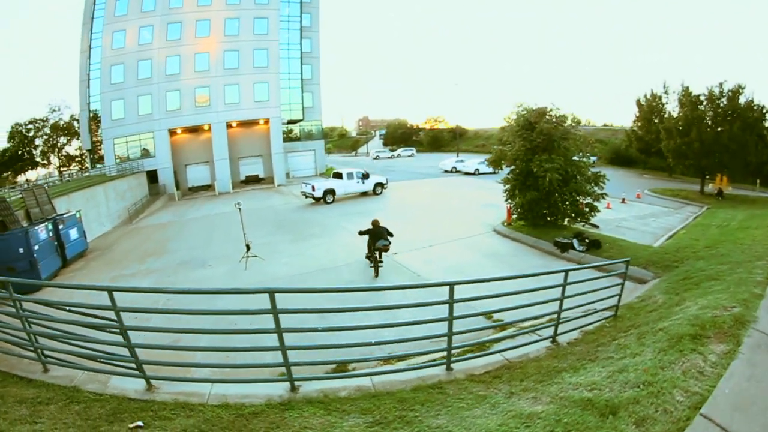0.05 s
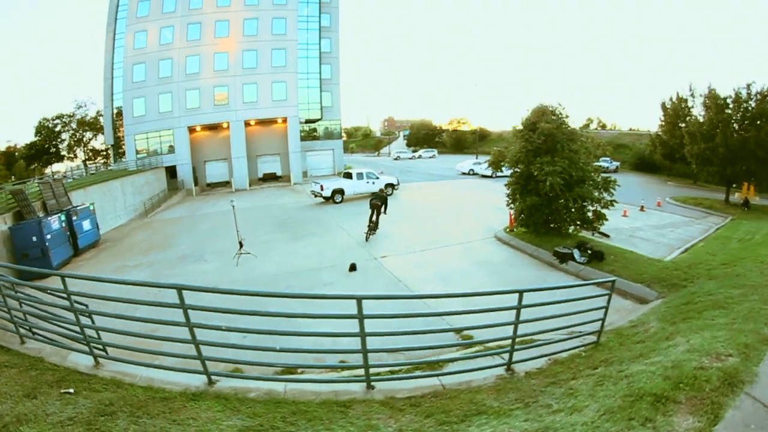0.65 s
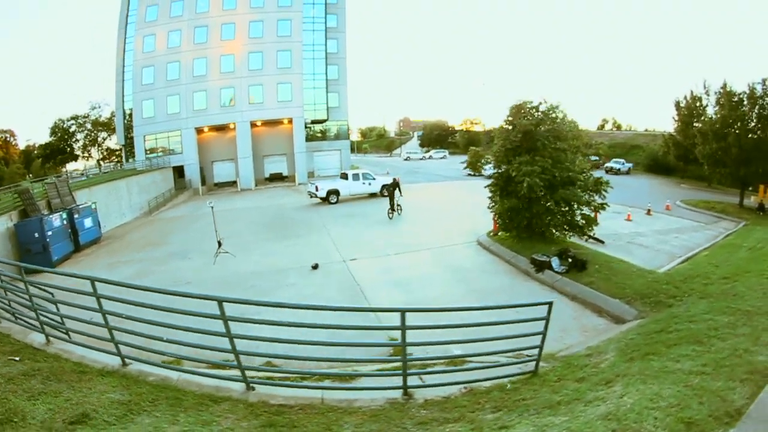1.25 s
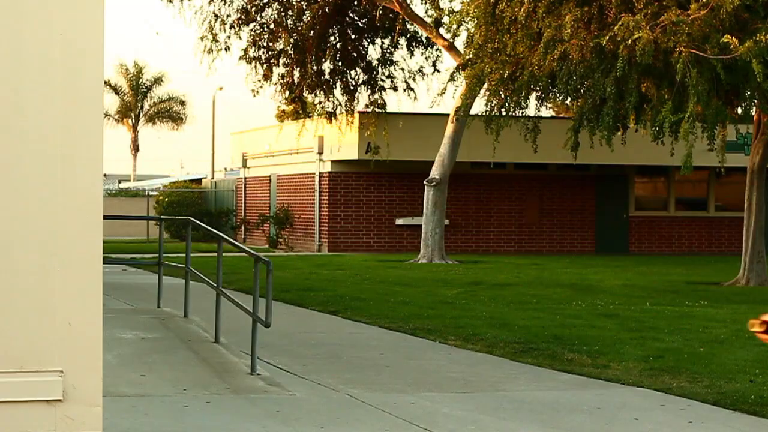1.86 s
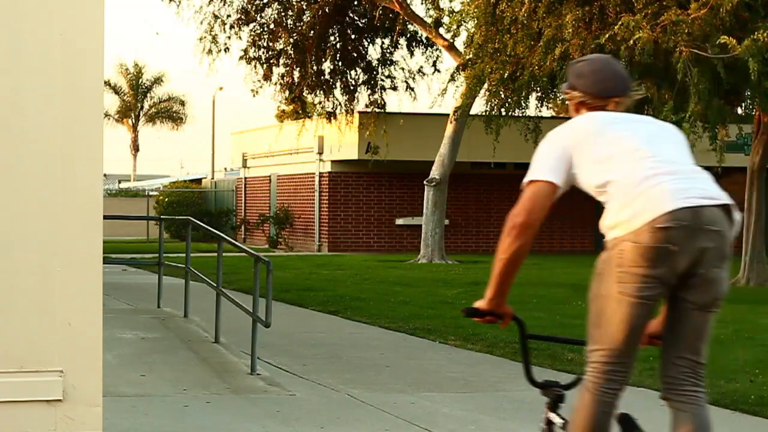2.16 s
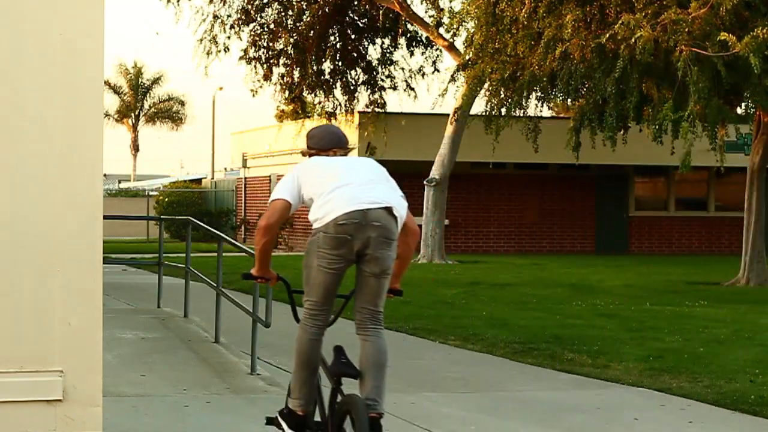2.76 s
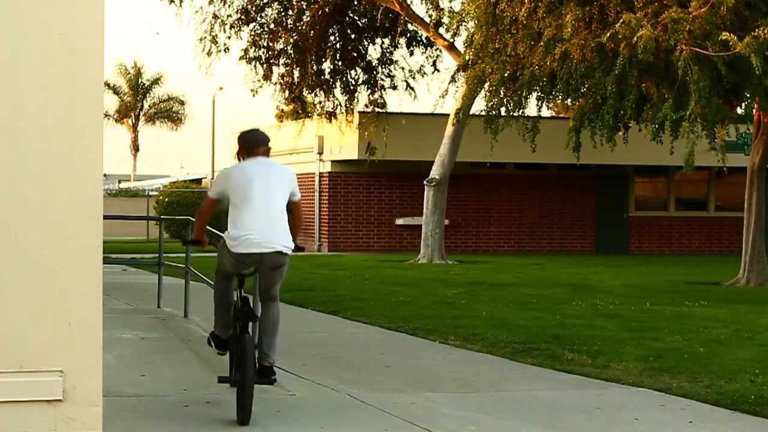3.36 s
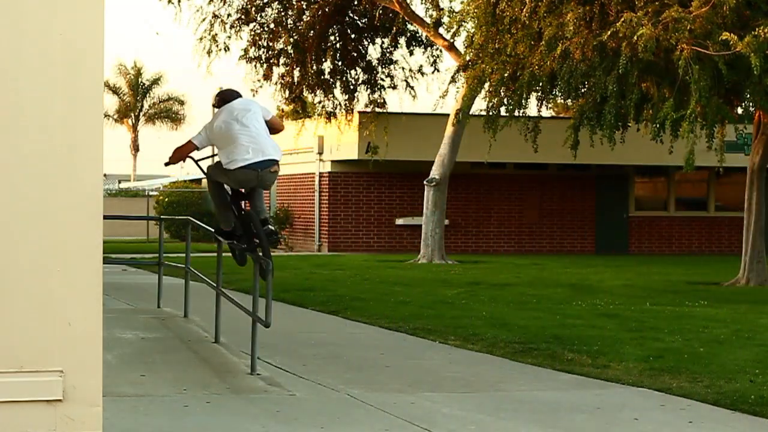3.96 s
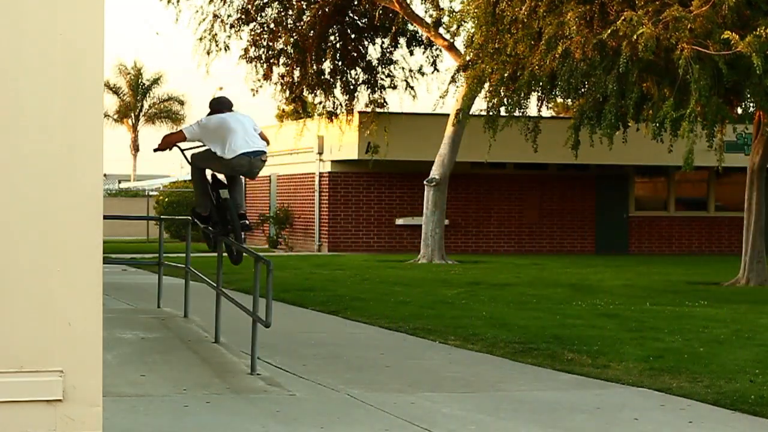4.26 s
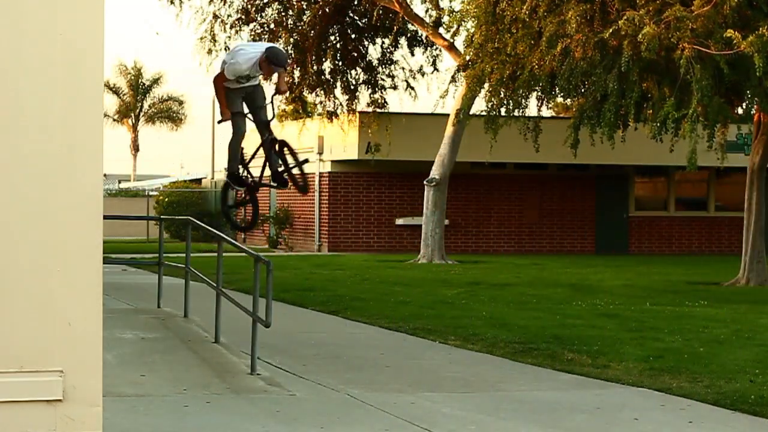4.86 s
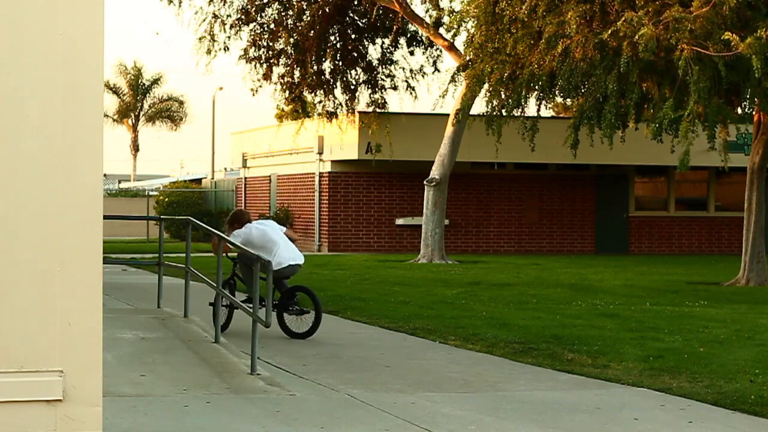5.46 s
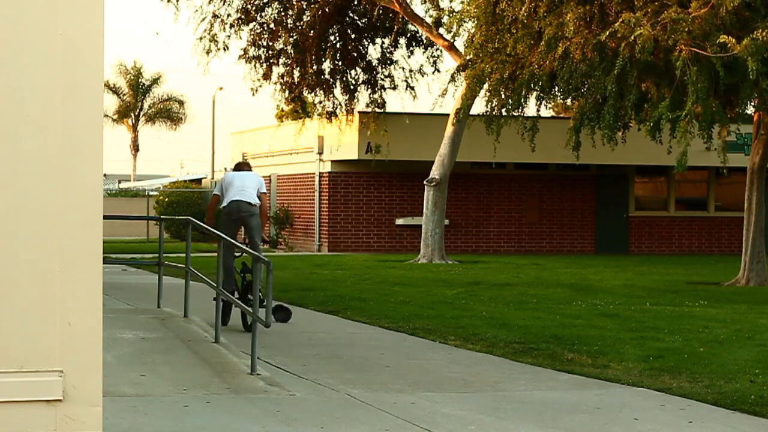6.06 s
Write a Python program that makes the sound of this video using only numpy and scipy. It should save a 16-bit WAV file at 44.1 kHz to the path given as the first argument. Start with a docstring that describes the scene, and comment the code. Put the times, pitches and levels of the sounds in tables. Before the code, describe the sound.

A bicycle freewheel buzzes through gusts, pauses, then buzzes again before a ringing handrail grind and a clattering landing.

```python
"""BMX coasting and rail grind

Two runs head away from the microphone, parted by a short silence. In the first, gusts buffet the
microphone, loose parts rattle and the freewheel buzzes as its pawls drop off the ratchet teeth.
In the second, the bike coasts to a steel handrail and hops on with a crack; sliding friction keeps
the pipe's modes ringing. It lands with a few knocks and rolls off ticking, echoed by nearby walls."""
import sys
import numpy as np
from scipy import signal
from scipy.fft import rfft, irfft, next_fast_len
from scipy.io import wavfile
from scipy.ndimage import map_coordinates

SR = 44100
rng = np.random.default_rng(int(sys.argv[2]) if len(sys.argv) > 2 else 0)


def wrap_up_sound(samples):
    """Save the sound to the file named by the first command line argument, as 16-bit audio."""
    columns = np.atleast_2d(samples).T
    # keep every value between -1 and 1, then stretch to whole-number steps
    tamed = np.clip(columns, -1, 1)
    steps = np.round(tamed * 32767).astype(np.int16)
    wavfile.write(sys.argv[1], SR, steps)


N = 269451
FIRST_RUN_END_S, SECOND_RUN_S, STRIKE_S = 1.509, 1.741, 3.9992  # strike: the peg meets the rail
# modes of the bike's frame: (frequency [Hz], relative level [dB], t60 [s])
FRAME_MODES = [(277, -2.5, 0.056), (384.6, -5, 0.19), (686.5, 1, 0.061), (1068, -11, 0.055),
               (1340, -2, 0.031), (2370, 6, 0.025)]


def amp(db):
    """Decibels to amplitude ratio."""
    return 10 ** (np.asarray(db) / 20)


def unit(x):
    """x at rms 1."""
    return x / np.sqrt(np.mean(x ** 2) + 1e-20)


def along(points, hz):
    """(frequency [Hz], value) points interpolated on a log axis."""
    f, v = np.transpose(points)
    return np.interp(np.log(hz + 1), np.log(f + 1), v)


def curves(rows):
    """One value per sample for each column after the time."""
    s, *cols = np.transpose(rows)
    return [np.interp(np.arange(N) / SR, s, c) for c in cols]


def during(start, end=np.inf):
    """True between two times."""
    t = np.arange(N) / SR
    return (t >= start) & (t < end)


def since(s):
    """Seconds elapsed since time s, zero before it."""
    return np.maximum(np.arange(N) / SR - s, 0)


def wobble(rate):
    """A smooth random curve, rate knots a second."""
    return map_coordinates(rng.standard_normal(N // 8), [np.arange(N) * rate / SR], mode="wrap")


def add(track, s, sound):
    """Superpose a sound on a track at time s."""
    part = track[max(round(s * SR), 0):][:len(sound)]
    part += sound[:len(part)]


def burst(t60, size=8192):
    """Exponentially decaying noise of energy 1."""
    decay = rng.standard_normal(size) * amp(-60 * np.arange(size) / SR / t60)
    return decay / np.linalg.norm(decay)


def coloured(x, spectrum, size=4096):
    """x through a minimum-phase filter of energy 1, shaped by (frequency [Hz], level [dB]) points."""
    cepstrum = irfft(np.log(amp(along(spectrum, np.fft.rfftfreq(size, 1 / SR)))))
    cepstrum[1:size // 2] *= 2
    cepstrum[size // 2 + 1:] = 0
    response = irfft(np.exp(rfft(cepstrum)))
    return signal.fftconvolve(x, response / np.linalg.norm(response))[:len(x)]


def noise(spectrum):
    """Coloured noise of rms 1."""
    return unit(coloured(rng.standard_normal(N), spectrum))


def ring(modes, vary_db):
    """Free vibration: one second of damped modes, energy 1, of random strength and phase."""
    t = np.arange(SR) / SR
    tone = np.zeros(SR)
    for hz, db, t60 in modes:
        envelope = amp(db + vary_db * rng.normal() - 60 * t / t60)
        tone += envelope * np.sin(2 * np.pi * (hz * t + rng.random()))
    return tone / np.linalg.norm(tone)


def pawls(times, gains, spread_s, t60, snap):
    """Impact excitation: three pawls drop off each tooth a moment apart, and the hub shell resonates."""
    # response of the hub shell: (frequency [Hz], relative level [dB])
    shell_spectrum = [(1000, -36.5), (1600, -12), (2400, -3), (2750, -5), (3100, 3.5), (3700, 1.5),
                      (4600, -5), (8000, -8), (10000, -4), (12000, 2.5), (14700, -1), (16500, -19)]
    # its main resonance, prominent while the bike is near: (frequency [Hz], relative level [dB])
    near_spectrum = [(2700, -35), (3080, 0), (3700, -2), (4300, -35)]
    drops = np.zeros(N)
    for s, gain in zip(times, gains):
        for lag in np.linspace(0, spread_s, num=3):
            click = burst(t60, size=1024)
            click[0] += snap * rng.normal()
            add(drops, s + lag * rng.uniform(.7, 1.3), gain * amp(1.5 * rng.normal()) * click)
    nearness = np.exp(-since(SECOND_RUN_S) / .35) * during(SECOND_RUN_S)
    near_ring = amp(-5) * nearness * coloured(drops, near_spectrum)
    return coloured(drops, shell_spectrum) + amp(-13.5) * hub_ring(drops) + near_ring


def hub_ring(drops, detune=.025):
    """Each drop excites heavily damped modes; their pitch wanders as three tunings cross-fade."""
    # modes of the freewheel: (frequency [Hz], relative level [dB], t60 [s])
    hub_modes = [(1734, -0.5, 0.036), (2457, -1, 0.043), (3315, -1, 0.016)]
    tunings = (1 - detune, 1, 1 + detune)
    shares = amp(6 * np.array([wobble(7) for _ in tunings]))
    shares /= np.linalg.norm(shares, axis=0)
    out = np.zeros(N)
    for tuning, share in zip(tunings, shares):
        modes = [(hz * tuning, db, t60) for hz, db, t60 in hub_modes]
        out += signal.fftconvolve(drops * share, ring(modes, vary_db=2))[:N]
    return out


def teeth(start, end, rate):
    """Samples at which a tooth passes: the integral of the tooth rate crosses a whole number."""
    passed = np.cumsum(rate * during(start, end)) / SR
    return np.flatnonzero(np.diff(np.ceil(passed), prepend=0))


def coasting():
    """An impulse train, one click a tooth, is heard as a buzz that fades as the bike draws away."""
    # the coasting hub, one list a run: (time [s], tooth rate [1/s], click level [dB])
    coasting_runs = [
        [(0, 103, -27), (.12, 43, -35.5), (.19, 45, -27.5), (.28, 67, -22.5), (.35, 84, -28.5),
         (.62, 110, -36.5), (.76, 91, -35), (1.15, 81, -44), (1.5, 79, -44.5)],
        [(1.741, 85.6, -17.5), (1.95, 94, -20.5), (2.12, 73, -18), (2.26, 63, -20.5), (3.04, 72, -25.5),
         (3.16, 48.6, -22)],
    ]
    times, levels = [], []
    for run in coasting_runs:
        rate, click_db = curves(run)
        at = teeth(run[0][0], run[-1][0], rate)
        times.extend(at / SR)
        levels.extend(click_db[at] + 1.3 * rng.standard_normal(len(at)))
    return pawls(times, amp(levels), spread_s=.0024, t60=0.014, snap=0.43)


def spurts(idle_teeth_per_s=22):
    """As the repetition rate rises and falls, the hub's ticks fuse into a buzz and part again."""
    # surges of the freewheel during the trick:
    # (start [s], end [s], peak time [s], peak tooth rate [1/s], width [s], click level [dB])
    hub_surges = [(3.170, 3.45, 3.345, 120, .138, -24), (3.455, 3.69, 3.527, 46.5, .135, -24.5),
                  (3.706, 3.99, 3.857, 147, .114, -25.5), (4.1, 4.66, 4.38, 97, .15, -31.5),
                  (4.687, 4.96, 4.835, 36.1, .099, -25.5), (5.077, 5.32, 5.362, 123, .1435, -26.5),
                  (5.33, 5.58, 5.38, 105, .2, -31), (5.637, 6.11, 5.738, 36.6, .059, -27)]
    t = np.arange(N) / SR
    times, levels = [], []
    for start, end, peak_s, peak_rate, width, db in hub_surges:
        surge = np.exp(-((t - peak_s) / width) ** 2)
        at = teeth(start, end, idle_teeth_per_s + (peak_rate - idle_teeth_per_s) * surge)
        times.extend(at / SR)
        levels.extend(db + 1.1 * rng.standard_normal(len(at)))
    return pawls(times, amp(levels), spread_s=.002, t60=0.021, snap=0.26)


def rail_ring(t60, vary_db):
    """Damping grows with frequency: t60 holds at 1 kHz, and the rail's higher modes die sooner."""
    # modes of the steel handrail: (frequency [Hz], relative level [dB])
    rail_modes = [(305, -5.5), (388, 4), (673, 2), (818, -10.5), (1023, -1), (1157, -17), (1254, 0.5),
                  (1663, -5.5), (1841, -14), (2090, -10), (2320, -12.5), (2700, -6.5), (3050, -11),
                  (4145, -10), (4765, -16), (5495, -11), (6075, -10.5), (6900, -8.5)]
    return ring([(hz, db, t60 * (hz / 1000) ** -.3) for hz, db in rail_modes], vary_db)


def strike(round_trip_s=.0555):
    """The peg's impact launches a shock that reflects up and down the pipe, which rings on."""
    # the crack of peg on rail: (frequency [Hz], relative level [dB])
    crack_spectrum = [(70, -12), (200, 7.5), (700, -0.5), (1050, 11), (1600, 1.5), (2500, -2), (4000, 0.5),
                      (5900, 2.5), (8000, -5.5), (13000, -4), (16500, -20.5)]
    blows = np.zeros(N)
    add(blows, STRIKE_S - .005, amp(-7.5) * burst(t60=.05))  # the tyre touches first
    add(blows, STRIKE_S, amp(14.6) * burst(t60=0.015) + amp(4.5) * burst(t60=0.037))
    for trip in range(1, 6):
        add(blows, STRIKE_S + trip * round_trip_s, amp(-4 - trip) * burst(t60=.03))
    out = coloured(blows, crack_spectrum)
    add(out, STRIKE_S, amp(6) * rail_ring(t60=0.47, vary_db=2))
    return out


def friction(rough_db):
    """Surface roughness: the peg catches on countless tiny ridges, giving noise of uneven strength."""
    return unit(rng.standard_normal(N) * amp(rough_db * wobble(700))) * (since(STRIKE_S) > 0)


def grind():
    """Forced vibration: friction under the sliding peg hisses and drives the pipe's resonances."""
    # the pipe's drone: (frequency [Hz], relative level [dB])
    drone_spectrum = [(120, -26.5), (220, -4), (370, 7), (500, -12), (680, -1.5), (860, -8.5), (1150, 0),
                      (2000, -9), (4000, -44.5)]
    # the hiss of the contact: (frequency [Hz], relative level [dB])
    scrape_spectrum = [(800, -25), (1500, -11), (2350, 0.5), (3200, -7), (4400, -7.5), (5100, -14),
                       (5900, -7), (9000, -17.5), (14500, -15.5), (16500, -34.5)]
    # the peg bites and the rail screeches: (time [s], boost of the drive [dB], width [s])
    peg_bites = [(4.167, 5, .012), (4.47, 6, 0.011)]
    drive_spectrum = [(400, -5.5), (1200, 1.5), (4500, 15.5), (12000, 1)]
    press_s, hop_s, still_s = 4.28, 4.492, 4.7  # the rider presses down, hops off; the shudder dies
    age = since(STRIKE_S)
    dying_db = 65 * since(still_s)
    impact_db = 2.5 * np.exp(-age / 0.097)
    drone_db = -37 + impact_db - 10 * age - dying_db
    press_db = 8 * np.minimum(since(press_s) / 0.15, 1)
    release_db = 10.5 * np.minimum(since(hop_s) / 0.026, 1) + 30 * since(hop_s)
    bite_db = sum(db * np.exp(-((STRIKE_S + age - s) / width) ** 2) for s, db, width in peg_bites)
    scrape_db = -39 + press_db - release_db - dying_db + 1.3 * wobble(60)
    drone = amp(drone_db) * coloured(friction(rough_db=2), drone_spectrum)
    scrape = amp(scrape_db + 0.29 * bite_db) * coloured(friction(rough_db=1.5), scrape_spectrum)
    drive = coloured(amp(scrape_db + bite_db - 4) * friction(rough_db=5.5), drive_spectrum)
    screech = signal.fftconvolve(drive, rail_ring(t60=0.16, vary_db=1))[:N]
    return drone + scrape + screech


def cushioned(blow, cutoff_hz):
    """Contact compliance is a low-pass filter: the softer the contact, the lower the cutoff."""
    roll_off = [(cutoff_hz, 0), (2 * cutoff_hz, -8), (4 * cutoff_hz, -26), (16 * cutoff_hz, -48)]
    return coloured(blow, [(50, -25), (280, 0)] + roll_off)


def landing():
    """Each slam is an impulse that makes the bike clatter and sets its frame in free vibration."""
    # the wheels hit concrete and bounce: (time [s], push level [dB], cutoff [Hz], ring level [dB])
    wheel_slams = [(5.3185, 1.5, 4280, 0), (5.3779, 2.5, 2610, -4.5), (5.3806, 1.5, 1940, -2.5),
                   (5.443, -18, 800, -1.5)]
    out = np.zeros(N)
    for s, db, cutoff_hz, ring_db in wheel_slams:
        blow = amp(-9.5) * burst(t60=0.025)
        blow[0] -= 1  # the sharp push that starts the clatter
        add(out, s, amp(db) * cushioned(blow, cutoff_hz))
        add(out, s, amp(ring_db) * ring(FRAME_MODES, vary_db=2.5))
    return out


def rattles():
    """Loose parts collide at each jolt and faintly excite the modes of the frame."""
    # jolts to the bike: (time [s], level [dB], cutoff [Hz], t60 [s])
    bike_jolts = [(0.5509, 8, 770, 0.029), (0.7073, -6.5, 9000, .008), (.8335, -24, 14000, .008),
                  (1.072, 6, 768, 0.033), (1.278, 13, 734, .027), (1.2809, 11, 923, 0.029),
                  (5.3341, -8.5, 5000, 0.018), (5.443, -10, 7050, .06), (5.502, -7.5, 2220, 0.065),
                  (5.84, -12.5, 2900, .048)]
    out = np.zeros(N)
    for s, db, cutoff_hz, t60 in bike_jolts:
        add(out, s, amp(db) * cushioned(burst(t60), cutoff_hz))
        add(out, s, amp(db - 19) * ring(FRAME_MODES, vary_db=6))
    return out


def wind(attack_s=0.014, release_s=0.032):
    """Turbulence: in the first run, gusts over a fading breeze shake the microphone and rush past it."""
    # pressure fluctuations on the microphone: (frequency [Hz], relative level [dB])
    buffet_spectrum = [(20, -28), (70, -5), (140, 0), (230, 0), (420, -5), (780, -17.5), (1500, -31.5),
                       (3000, -46.5), (7000, -71.5)]
    # the rush of passing air: (frequency [Hz], relative level [dB])
    rush_spectrum = [(150, -7.5), (400, 6.5), (750, 12), (1250, 8.5), (1800, 1), (2700, -1), (4500, -14),
                     (9000, -24.5), (15000, -30)]
    # gusts: (start [s], end [s], buffet level [dB], rush level [dB])
    gust_spans = [(-.03, 0.29, -27.5, -39), (0.276, 0.555, -21.5, -51), (.75, 0.95, -22, -45),
                  (1.004, 1.28, -27.5, -58), (1.458, 1.509, -31, -39.5)]
    t = np.arange(N) / SR
    buffet_gain, rush_gain = amp(-28 - 5 * t), amp(-34 - 6 * t)  # the breeze
    for start, end, buffet_db, rush_db in gust_spans:
        gust = np.minimum(since(start) / attack_s, 1) * np.exp(-since(end) / release_s)
        buffet_gain = np.hypot(buffet_gain, amp(buffet_db) * gust)  # incoherent sounds add in power
        rush_gain = np.hypot(rush_gain, amp(rush_db) * gust)
    buffet = unit(coloured(rng.standard_normal(N) * amp(3.2 * wobble(90)), buffet_spectrum))
    rush = amp(1.7 * wobble(40)) * noise(rush_spectrum)
    return (buffet_gain * buffet + rush_gain * rush) * during(0, FIRST_RUN_END_S)


def eddies():
    """Pressure dips in the core of a vortex, so each large eddy pops as it crosses the microphone."""
    # passing eddies: (time [s], level [dB], spectral peak [Hz])
    eddy_pops = [(.309, -2.5, 505), (.324, -12, 237), (.498, -8.5, 225), (.779, -5, 400), (0.917, -7, 220),
                 (.961, -6, 265), (1.008, -12, 480), (1.034, -5.5, 355), (1.485, -14.5, 173),
                 (2.639, -25.5, 138.9)]
    out = np.zeros(N)
    lag = np.arange(-SR // 50, SR // 50) / SR
    for s, db, hz in eddy_pops:
        u = (np.pi * hz * lag) ** 2
        add(out, s + lag[0], amp(db) * (2 * u - 1) * np.exp(-u))
    return out


def pavement():
    """Rolling noise of tyres on concrete recedes over a low ambient rumble in the second run."""
    # outdoor rumble: (frequency [Hz], relative level [dB])
    rumble_spectrum = [(22, -21.5), (53, -4.5), (78, 1.5), (125, -1.5), (175, -4.5), (240, -14.5),
                       (500, -31.5), (1200, -63.5)]
    # the hush of the tyres: (frequency [Hz], relative level [dB])
    tyre_spectrum = [(150, -16.5), (290, 0.5), (370, 4), (520, -3), (1050, -1.5), (2200, -6), (4000, -16.5),
                     (15000, -33)]
    rumble = amp(-46 + 0.82 * wobble(21)) * noise(rumble_spectrum)
    tyres = amp(-49.5 - .7 * since(SECOND_RUN_S) + 1.5 * wobble(13)) * noise(tyre_spectrum)
    return (rumble + tyres) * during(SECOND_RUN_S)


def yard(x):
    """Reverberation: reflections from the walls merge into a diffuse tail whose treble dies first."""
    # reverberation time of the yard: (frequency [Hz], t60 [s])
    decay_times = [(200, 0.95), (1500, 0.74), (5000, 0.42), (14000, 0.11)]
    hz, t, bands = signal.stft(rng.standard_normal(SR), SR, nperseg=256)
    decay = amp(-60 * t / along(decay_times, hz)[:, None])
    _, tail = signal.istft(bands * decay, SR, nperseg=256)
    return signal.fftconvolve(x, tail / np.linalg.norm(tail))[:N]


def scene():
    """The sources superpose at one microphone, louder on the left; only the second run has walls near."""
    hub = coasting() + spurts()
    jolts = rattles() + landing()
    rail = strike() + grind()
    to_walls = amp(-4.5) * hub + amp(-12) * jolts + amp(-13.5) * rail
    echo = yard(to_walls * during(SECOND_RUN_S))
    mono = hub + jolts + rail + echo + wind() + eddies() + pavement()
    return mono * amp([[3.0], [-4.7]])


def record(dry):
    """Saturation rounds the loudest peaks, silence parts the runs, and a low-pass cuts the top treble."""
    ceiling = 0.74 * np.std(dry, axis=1, keepdims=True) / np.std(dry[0])
    clipped = dry / (1 + np.abs(dry / ceiling) ** 6) ** (1 / 6)
    gated = clipped * ~during(FIRST_RUN_END_S, SECOND_RUN_S)
    size = next_fast_len(N + 8192)
    passband = np.fft.rfftfreq(size, 1 / SR) < 16800
    return irfft(rfft(gated, size) * passband, size)[:, :N]


dry = scene()
out = record(dry)
wrap_up_sound(out)
```